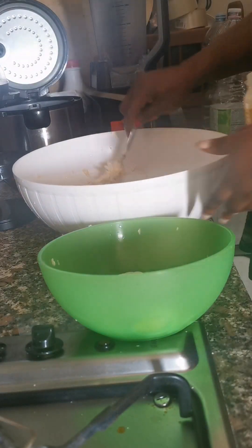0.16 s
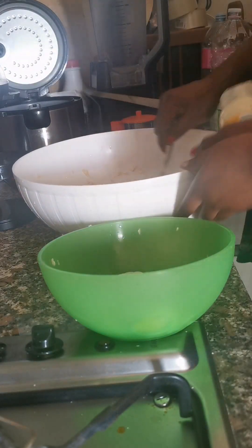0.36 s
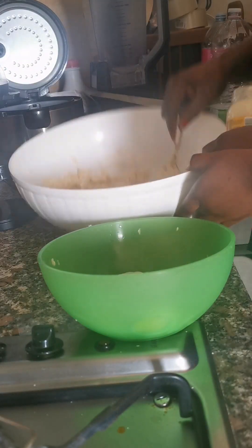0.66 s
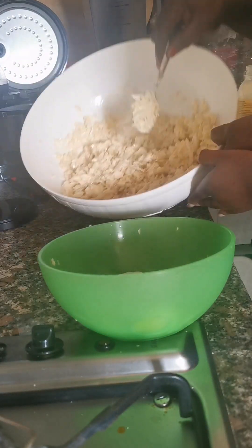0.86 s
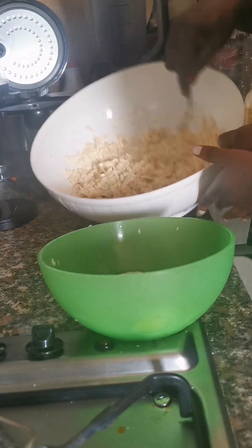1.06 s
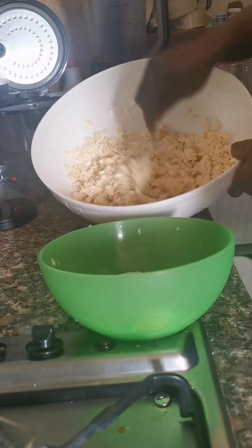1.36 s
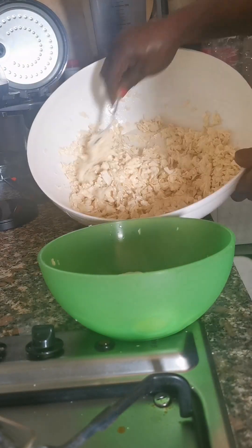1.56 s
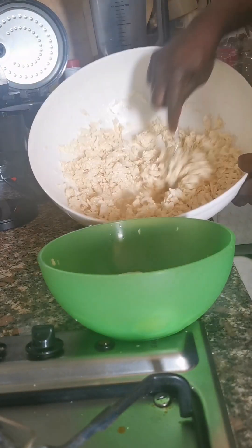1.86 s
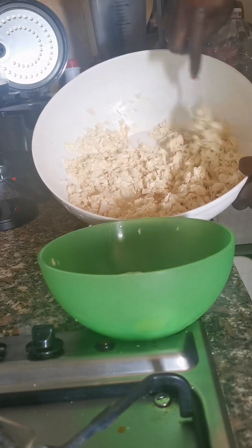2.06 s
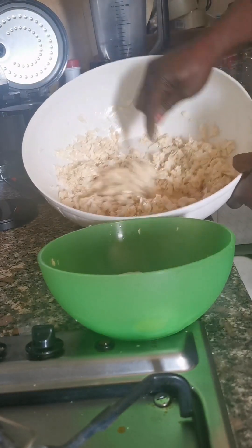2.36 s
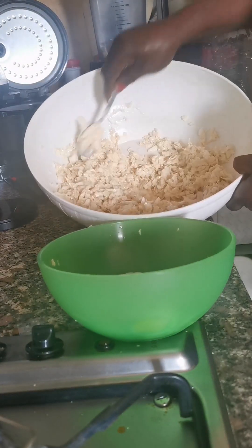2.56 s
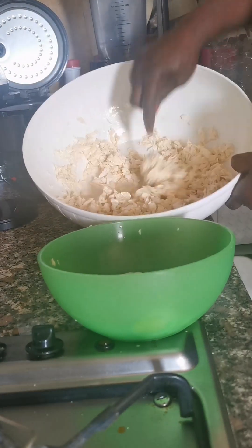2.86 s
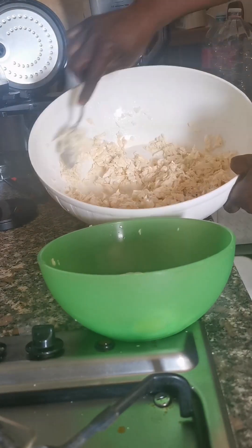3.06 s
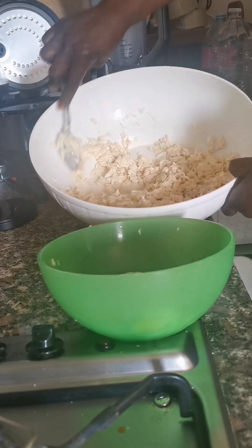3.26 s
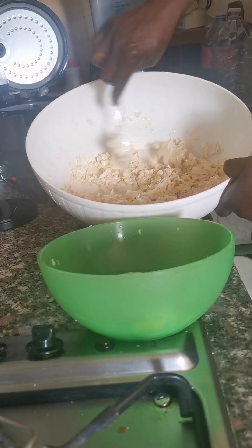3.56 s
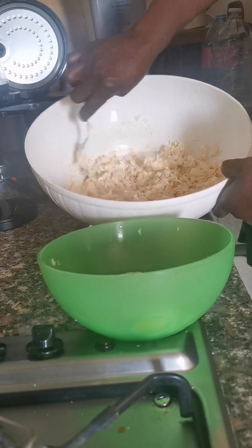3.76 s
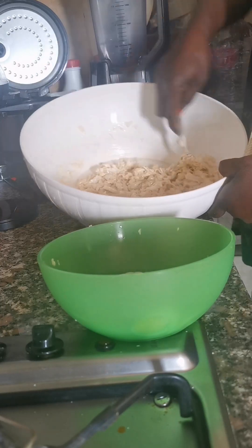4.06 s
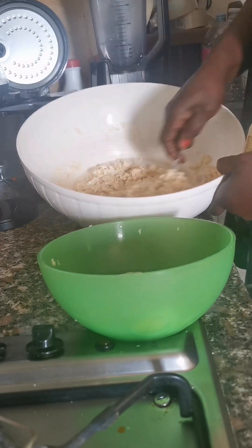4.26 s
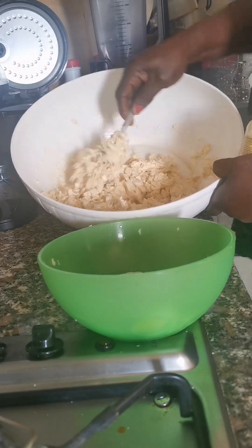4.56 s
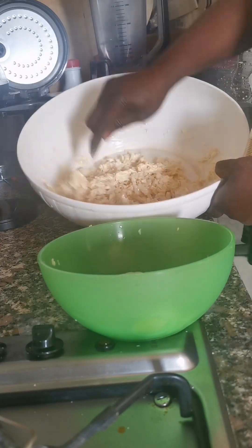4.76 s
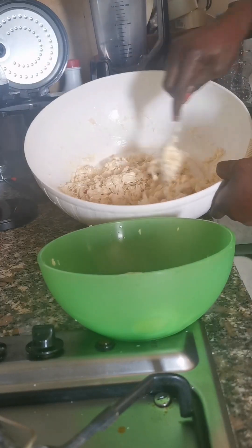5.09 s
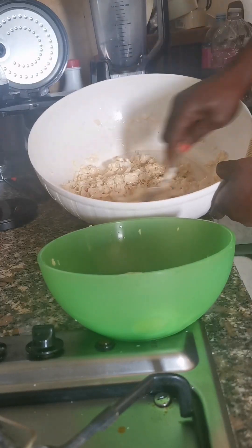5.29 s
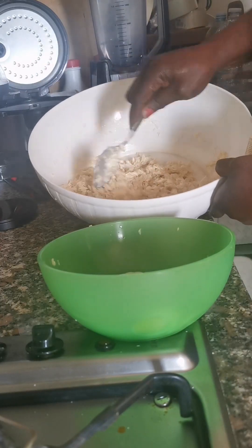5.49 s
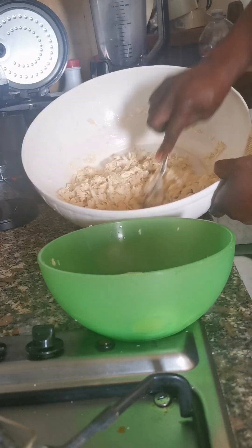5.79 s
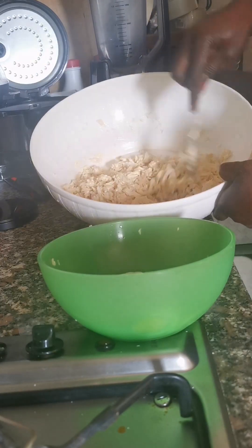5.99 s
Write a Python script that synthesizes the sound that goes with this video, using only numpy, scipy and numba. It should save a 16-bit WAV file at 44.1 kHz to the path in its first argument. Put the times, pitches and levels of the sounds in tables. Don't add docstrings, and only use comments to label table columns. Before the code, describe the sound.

A steel spoon knocks dully and scrapes around a large hollow plastic bowl, crushing crumbly food, close up in a quiet, low-humming kitchen.

```python
import sys
import numpy as np
from scipy import signal
from scipy.fft import rfft, irfft
from scipy.io import wavfile
from scipy.ndimage import uniform_filter1d
from numba import njit

SR = 44100
rng = np.random.default_rng(int(sys.argv[2]) if len(sys.argv) > 2 else 0)


def makeup_ratio(level_db):
    decades = np.asarray(level_db, float) / 20
    return 10 ** decades


def unload_audio(sound):
    columns = np.transpose(np.atleast_2d(sound))
    steps = np.round(np.clip(columns, -1, 1) * 32767)
    wavfile.write(sys.argv[1], SR, steps.astype(np.int16))


N = 270333

# t/s, hollow ring level/dB, then thud, wall clack and steel tick relative to it [dB]
KNOCKS = [(0.273, -43, -13, -4.5, -27), (0.301, -14.5, -9.5, -7.5, -33.5), (0.472, -23, -17.5, -2.5, -23.5),
          (1.116, -9, -16, -5.5, -56), (2.221, -31, -9, 10, -2.5), (2.432, -27.5, -21, -3, -14),
          (2.68, -42, -10.5, 10, -4), (2.71, -26, -20, -1.5, -28), (2.719, -10.5, -12.5, -10.5, -27.5),
          (2.854, -40, -19, 7, -7), (2.916, -35, -15, 2.5, -5), (3.105, -40, -11, -7, -40),
          (3.204, -23.5, -9.5, -1.5, -12), (3.792, -42, -1.5, 5, -33), (3.829, -11, -1.5, -11, -22.5),
          (4.144, -34, -24, -4, -14), (4.325, -38, -28, -16, -26), (4.843, -36, 1.5, 9.5, -0.5),
          (5.289, -30.5, -11, -9.5, -17), (5.713, -21, -8.5, -8, -13)]
# t/s, wall clack level/dB, then hollow ring and steel tick relative to it [dB]
TAPS = [(0.079, -44, -5, -17), (0.602, -44.5, 0.5, -15), (0.673, -49, 9, -31), (0.719, -45.5, -2.5, -16),
        (0.962, -64.5, -8, 1), (1.023, -55.5, 0.5, -26), (1.262, -45, -8, -18), (1.359, -35, -14, -40),
        (1.415, -44, -2.5, -32), (1.543, -78.5, -3, 15), (1.738, -50, 4.5, -26), (1.944, -42, -4, -34),
        (2.16, -72, -6, 5), (2.334, -45.5, -5, -28), (2.555, -51, -10.5, -38), (2.604, -70, 20, -19),
        (3.366, -46, -19, -8), (3.469, -46, -28, -0.5), (3.517, -51.5, -1, 5), (4.024, -39, -17, 6),
        (4.485, -65, 6.5, -16), (4.664, -49, -31, -35), (4.706, -48, -14, -35), (4.724, -50, -27, -32),
        (5.053, -53, -10, -12), (5.137, -67, -16, 8.5), (5.28, -48, -1, -3), (5.388, -50, -11, -12),
        (5.498, -72, -1, 9), (5.889, -44, -6, -30)]
TAP_THUD_DB = -16


def hits():
    s, hollow, thud, wall, tick = np.transpose(KNOCKS)
    knocks = [s, hollow + thud, hollow, hollow + wall, hollow + tick]
    s, wall, hollow, tick = np.transpose(TAPS)
    taps = [s, wall + hollow + TAP_THUD_DB, wall + hollow, wall, wall + tick]
    rows = np.hstack([knocks, taps])
    return rows[:, np.argsort(rows[0])]


# delay t/s, level/dB
SLAPS = [
    (.0020, 0),
    (.0040, 1),
    (.0061, -3.5),
    (.0081, 1),
    (.0100, -9),
]


def blows(db, fade_db, scatter_db=3.5, wobble_s=0.00023):
    s = hits()[0][:, None]
    direct = (0.00063, 0.0066)  # (s, dB)
    lag, slap_db = np.transpose([direct] + SLAPS)
    chance = rng.standard_normal((len(s), 2, len(lag)))
    time_s = s + lag + wobble_s * chance[:, 0] * (lag > 0)
    at = np.clip((time_s * SR).astype(int), 0, N - 1)
    level_db = db[:, None] + slap_db - fade_db * np.arange(len(lag)) + scatter_db * chance[:, 1]
    out = np.zeros(N)
    np.add.at(out, at, makeup_ratio(level_db))
    return out


@njit
def ring(x, poles, which):
    out, z = np.empty(len(x), np.complex128), 0j
    for i in range(len(x)):
        z = z * poles[which[i]] + x[i] + 1e-18
        out[i] = z
    return out


def bowl(modes, knock_db, fade_db, rub, twist, detune=0.028, soft_db=0):
    soft_hz = 1100
    which = np.searchsorted(hits()[0] * SR - 40, np.arange(N))
    out = np.zeros((2, N))
    for hz, db, t60 in modes:
        shift = 1 + detune * rng.standard_normal(which[-1] + 1)
        poles = np.exp((2j * np.pi * hz * shift - np.log(1000) / t60) / SR)
        push = blows(knock_db - soft_db * np.log2(hz / soft_hz), fade_db) + rub
        z = ring(push, poles, which)
        turn = twist * rng.uniform(0.58, 1)
        ports = np.array([[1], [-1]])
        out += makeup_ratio(db) * (np.cos(turn) * z.imag + np.sin(turn) * z.real * ports)
    return band(out, 0.77 * modes[0][0], 1.75 * modes[-1][0])


# f/Hz, level/dB, t60/s
THUD = [(174, -16, 0.058), (221, 6, 0.06), (261.6, 6, 0.061), (336, 8, 0.081)]


def thud(drag_db):
    rub = grit(1200, 2.1, 2.5) * makeup_ratio(drag_db - 37.5)
    return bowl(THUD, hits()[1] - 7.0, 2.66, rub, 0.43)


# f/Hz, level/dB, t60/s
HOLLOW = [(438, -4.5, 0.016), (513.2, -1.5, 0.059), (525.8, -17, 0.12), (560, -3.5, 0.057),
          (580, -4.5, 0.056), (688.4, -8, 0.043)]


def hollow_ring(drag_db):
    rub = grit(900, 3.9, 4.5) * makeup_ratio(drag_db - 27)
    return bowl(HOLLOW, hits()[2] - 7.5, 1.91, rub, 0.42, 0.015)


# f/Hz, level/dB, t60/s
WALL = [(817, -9.5, 0.064), (880, -0.5, 0.035), (938, 3.5, 0.018), (1061, 2.5, 0.016), (1239, -2, 0.029),
        (1324, -1.5, 0.02), (1504, -3, 0.026), (1651, -3, 0.02), (1810, -6.5, 0.029), (2004, -1, 0.023),
        (2220, -6, 0.039), (2455, -15, 0.034), (2670, -9.5, 0.017), (2957, -10.5, 0.031),
        (3380, -11, 0.017), (3780, -14.5, 0.016), (4040, -11, 0.013), (4670, -21, 0.012)]


def wall_clack(scrape_db):
    _, _, _, wall_db, tick_db = hits()
    usual_gap_db, soft_db_oct = 19, 0.22
    soft_db = soft_db_oct * np.clip(wall_db - tick_db - usual_gap_db, -8, 27)
    rub = grit(2000, 2.6, 3.5) * makeup_ratio(scrape_db - 23.5)
    return bowl(WALL, wall_db - 10, 0.49, rub, 1.16, 0.037, soft_db)


def steel_tick():
    puff = np.exp(-np.arange(600) / SR / 0.0017)
    burst = signal.fftconvolve(blows(hits()[4] + 9, 2.27), puff)[:N]
    return scatter(lambda: burst * rng.standard_normal(N), 0.18, 0.00033)


# start t/s, end t/s, drag level/dB, edge scrape relative to it [dB]
RUBS = [(0.0, 0.126, -63, -2), (0.33, 0.45, -61, 5), (0.494, 0.624, -56, -9), (0.675, 0.741, -58.5, -2.5),
        (1.15, 1.335, -58.5, -3), (1.348, 1.45, -64, -1.5), (1.731, 1.811, -60, -2.5),
        (1.89, 2.047, -60, -3.5), (2.26, 2.4, -69, 5), (2.46, 2.588, -66, -10), (2.756, 2.882, -54, -1.5),
        (2.94, 3.026, -65.5, -7.5), (3.23, 3.51, -59.5, 1), (3.515, 3.68, -68, -2), (3.844, 3.96, -45, -9),
        (4.003, 4.209, -59.5, 4), (4.228, 4.392, -59.5, 5), (4.42, 4.49, -63, -17),
        (4.863, 4.968, -58.5, -1.5), (4.97, 5.066, -69, 1.5), (5.307, 5.459, -62, -1.5),
        (5.73, 5.953, -54.5, -4), (5.983, 6.132, -58.5, -8)]
LAND_S, LIFT_S = 0.03, 0.037


def rubbing():
    start, end, drag_db, edge_db = np.transpose(RUBS)
    lifted_db = -79.5
    return [swells(start, end, db, LAND_S, LIFT_S, lifted_db) for db in (drag_db, drag_db + edge_db)]


# peak t/s, level/dB, fine crumbs relative to it [dB], rise t/s, fall t/s
PUSHES = [(0.04, -61.5, -5, 0.24, 0.27), (0.37, -39.5, -11.5, 0.048, 0.15),
          (0.52, -51.5, -5.5, 0.058, 0.19), (0.7, -65, -8, .04, 0.14), (1.2, -63, -5, .1, 0.57),
          (1.5, -64.5, -3.5, 0.53, 0.054), (1.774, -67, -2.5, 0.17, 0.087), (1.859, -54, -5, 0.081, 0.41),
          (2.29, -52, -6.5, 0.11, 0.12), (2.47, -57.5, -8, .05, 0.14), (2.76, -59, -3, .05, .15),
          (2.872, -45, -10, 0.13, .05), (2.93, -73, -1, .05, 0.085), (3.195, -51, -7, 0.12, 0.062),
          (3.25, -56, 0.5, 0.069, .3), (3.372, -45.5, -12, .04, .2), (3.462, -51.5, 3, 0.12, 0.061),
          (4.021, -35, -2, 0.13, 0.11), (4.15, -41, -11, 0.12, 0.1), (4.35, -51.5, -13.5, 0.32, 0.094),
          (4.92, -49, -5, 0.096, 0.13), (5.36, -53.5, -5, 0.087, 0.14), (5.826, -46, -4.5, 0.097, 0.051),
          (5.964, -53, -6, .1, 0.11)]
CRUMB_HZ = [1800, 2800, 4000, 5600, 7800, 10000, 12800, 16500]


def crumbs():
    s, push_db, fine_rel_db, rise, fall = np.transpose(PUSHES)
    rest_db = -77
    coarse_db = swells(s, s, push_db, rise, fall, rest_db)
    fine_db = swells(s, s, push_db + fine_rel_db, rise, fall, rest_db)
    grains = scatter(lambda: grit(8000, 2.4, 0.92), 0.11, 0.0004)
    clumps, out = walk(70), 0
    for lo, hi in zip(CRUMB_HZ, CRUMB_HZ[1:]):
        fine = np.clip(np.log2(hi / 6500), 0, 1)
        db = (1 - fine) * (coarse_db + 10.5) + fine * (fine_db + 16.5)
        out = out + makeup_ratio(db + 1.7 * (clumps + walk(90))) * band(grains, lo, hi)
    return out


# f/Hz, level/dB per Hz
HISS = [(1410, -32.5), (2400, 1), (3580, -1), (4130, 1.5), (6110, 0), (6780, 1), (7830, -7.5), (11000, -8),
        (12200, -11), (15200, -20), (16200, -22)]


def hiss():
    return np.array([colour(x, HISS) for x in steel_tick() + crumbs()])


# peak t/s, level/dB, rise t/s, fall t/s
ROCKS = [(0.3, -37.5, 0.042, 0.17), (0.49, -40.5, 0.047, 0.25), (1.14, -31, 0.031, 0.19),
         (1.659, -62, .15, 0.12), (2.0, -62, .8, 0.055), (2.221, -40, 0.019, .13), (2.47, -52, 0.16, 0.073),
         (2.73, -41.5, 0.076, 0.12), (3.23, -45.5, 0.036, .08), (3.53, -53.5, 0.23, .03),
         (3.82, -37, 0.05, .04), (3.89, -51, .05, .4), (4.42, -44, 0.51, 0.13), (4.73, -58, .06, .1),
         (4.85, -39, 0.034, 0.086), (5.0, -62, .1, .2), (5.32, -56, .04, 0.12), (5.7, -41, 0.027, .25),
         (5.94, -40.5, 0.093, 0.21), (6.08, -34.5, 0.058, .06)]
# f/Hz, level/dB, t60/s
COUNTER = [(95.3, -0.5, 0.15), (126.4, -6, 0.099)]


def counter():
    s, peak_db, rise, fall = np.transpose(ROCKS)
    still_db = -69
    rock = grit(600, 1.2, 1.3) * makeup_ratio(swells(s, s, peak_db, rise, fall, still_db) - 26.5)
    return bowl(COUNTER, hits()[1] - 26, 2.7, rock, 0.077)


def spoon():
    drag_db, scrape_db = rubbing()
    return counter() + thud(drag_db) + hollow_ring(drag_db) + wall_clack(scrape_db) + hiss()


# f/Hz, level/dB, t60/s
BLADE = [(2150, -1.5, .04), (2330, -3, .035), (2780, -4, .03)]
# start t/s, end t/s, level/dB
CHATTER = [
    (4.17, 4.26, -75),
    (4.27, 4.35, -68),
]


def blade():
    judder = grit(500, 3.5, 5) * makeup_ratio(swells(*np.transpose(CHATTER), LAND_S, LIFT_S, -110))
    return bowl(BLADE, hits()[-1] - 16, 3, judder, 1.2, 0.03)


# f/Hz, level/dB
LEAN = [(60, 2), (150, 1), (350, -1), (700, -2), (1400, -4.5), (2800, -4), (5500, -2), (10000, -7),
        (14000, -9)]


def lean(near):
    return np.array([colour(near[0], LEAN, 0.43), colour(near[1], LEAN, -0.96)])


# f/Hz, t60/s, level/dB
KITCHEN = [(125.4, 0.3, -20), (341, 0.35, -13.5), (790, 0.35, -17), (1860, 0.36, -13.5), (3870, 0.37, -15),
           (9100, 0.19, -10)]


def kitchen(x):
    t = np.arange(SR // 2) / SR
    onset = 1 - np.exp(-t / 0.0019)
    tail = 0
    for hz, t60, db in KITCHEN:
        noise = band(rng.standard_normal((2, len(t))), hz / 1.55, hz * 1.55)
        tail = tail + makeup_ratio(db - 21.5 - 60 * t / t60) * noise * onset
    return signal.fftconvolve(x[None], tail, axes=1)[:, :N]


# f/Hz, level/dB per Hz
ROOM = [(15, -27), (25, 17.5), (108, 2.5), (285, -1.5), (335, 1), (405, -23), (516, -16), (818, -12),
        (1100, -22), (2110, -18), (3820, -28), (11000, -31), (16000, -28)]
ROOM_DB = -63.5


def hum():
    mid, side = (colour(rng.standard_normal(N) * makeup_ratio(1.5 * walk(4.4)), ROOM) for _ in range(2))
    side = colour(side, [(60, -21.0), (400, -9), (1200, -4.0)])
    return makeup_ratio(ROOM_DB + 0.5) / np.std(mid) * np.array([mid + side, mid - side])


def grit(rate, spread_db, flicker_db):
    size_db = spread_db * np.minimum(rng.exponential(size=N), 2.5)
    clicks = (rng.random(N) < rate / SR) * np.sign(rng.standard_normal(N)) * makeup_ratio(size_db)
    return unit(clicks) * makeup_ratio(flicker_db * walk(35))


def swells(start_s, end_s, peak_db, rise_s, fall_s, rest_db):
    t = np.arange(0, N + 64, 64)[:, None] / SR
    outside = np.maximum((start_s - t) / rise_s, (t - end_s) / fall_s)
    db = peak_db - 20 * np.maximum(outside, 0)
    total_db = 10 * np.log10(np.sum(makeup_ratio(db) ** 2, axis=1) + makeup_ratio(rest_db) ** 2)
    return np.interp(np.arange(N) / 64, np.arange(len(db)), total_db)


def walk(rate):
    k = int(SR / rate)
    held = np.repeat(rng.standard_normal(N // k + 1), k)
    return 1.3 * uniform_filter1d(uniform_filter1d(held, k), k)[:N]


def scatter(make, shared, lag_s):
    both, share = make(), np.clip(shared, 0, 1)
    pair = np.array([both, -np.roll(both, int(lag_s * SR))])
    return np.sqrt(share) * pair + np.sqrt(1 - share) * np.array([make(), make()])


def band(x, lo_hz, hi_hz):
    return signal.sosfilt(signal.butter(2, [lo_hz, hi_hz], "band", fs=SR, output="sos"), x)


def colour(x, table, share=0.93):
    gain_db = share * read(table, np.linspace(0, SR / 2, 513))
    cepstrum = irfft(gain_db * np.log(10) / 20)
    cepstrum[1:512] *= 2
    cepstrum[513:] = 0
    return signal.fftconvolve(x, irfft(np.exp(rfft(cepstrum)))[:512])[:N]


def read(table, hz):
    table = np.array(table, float)
    return np.interp(np.log(hz + 1), np.log(table[:, 0] + 1), table[:, 1])


def unit(x):
    return x / np.sqrt(np.mean(x ** 2))


def scene():
    near = spoon()
    room = kitchen(near[1]) + hum()
    return lean(near + blade()) + room


def band_limit(x):
    return signal.sosfilt(signal.butter(12, 17000, fs=SR, output="sos"), x)


def record(dry):
    top_cut = signal.ellip(6, 0.2, 30, 15900, fs=SR, output="sos")
    mix = signal.sosfilt(top_cut, dry)
    return band_limit(mix)


dry = scene()
out = record(dry)
unload_audio(out)
```